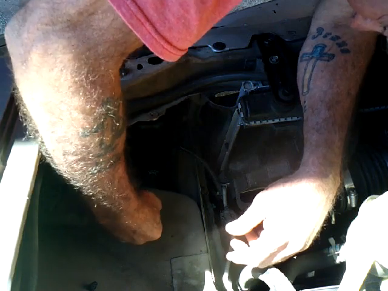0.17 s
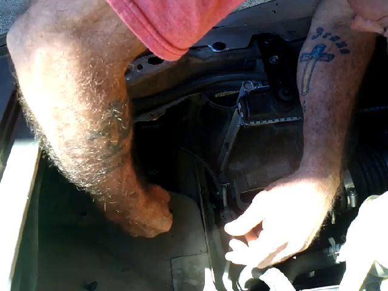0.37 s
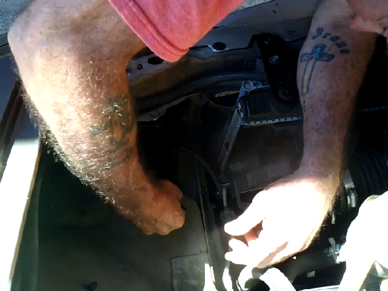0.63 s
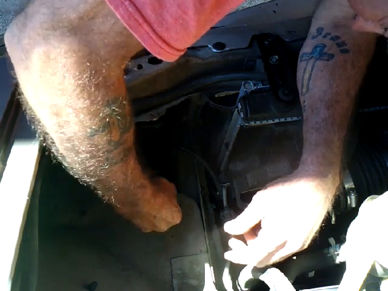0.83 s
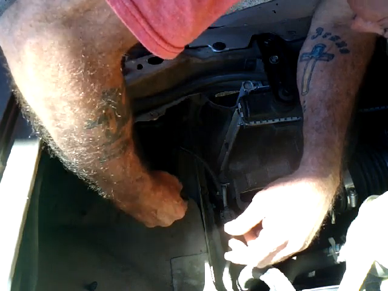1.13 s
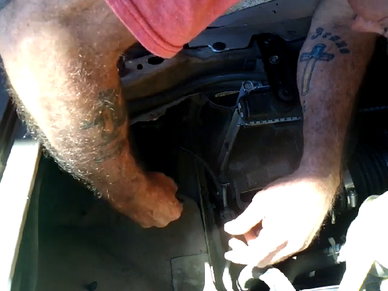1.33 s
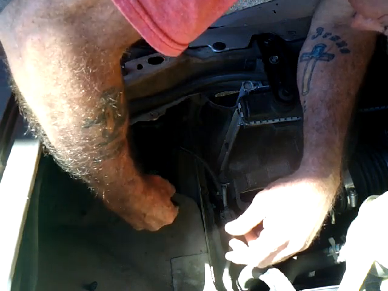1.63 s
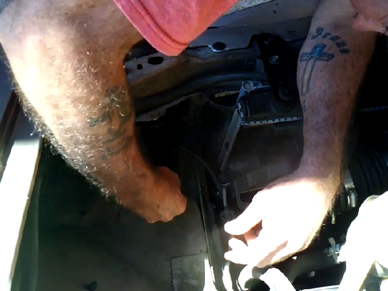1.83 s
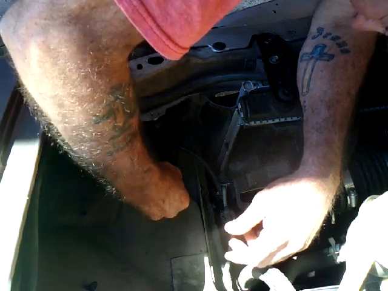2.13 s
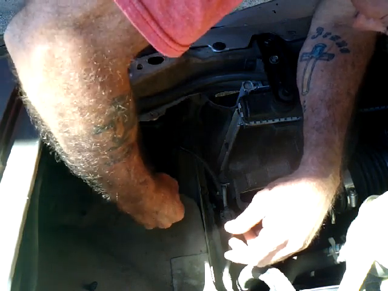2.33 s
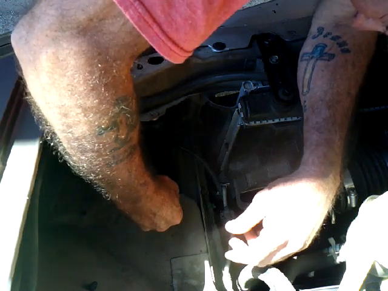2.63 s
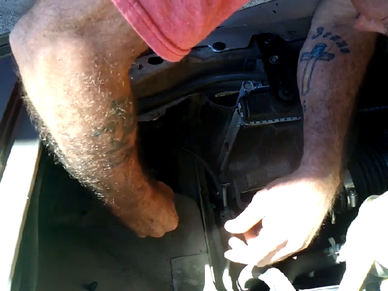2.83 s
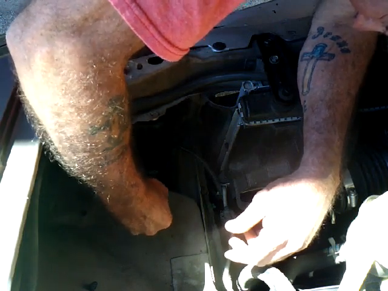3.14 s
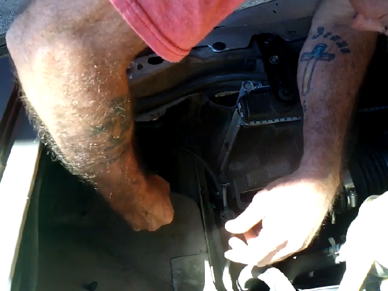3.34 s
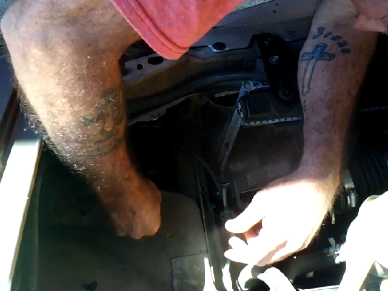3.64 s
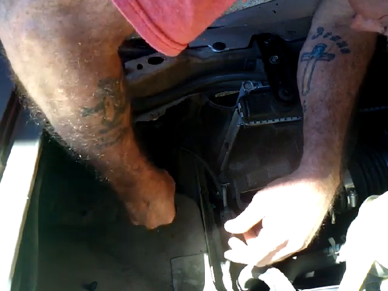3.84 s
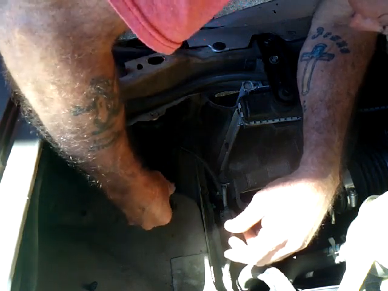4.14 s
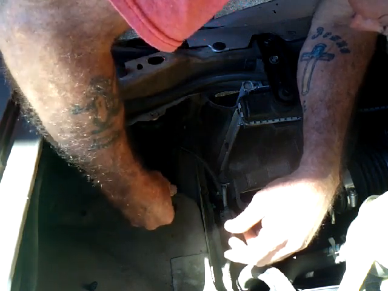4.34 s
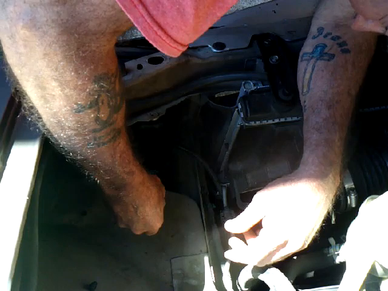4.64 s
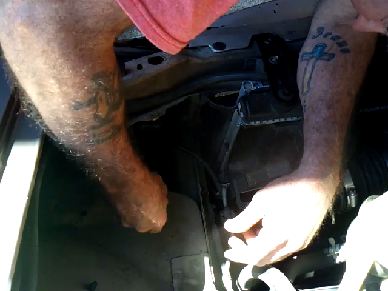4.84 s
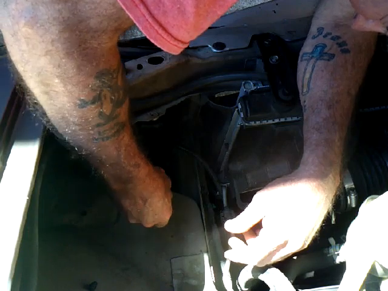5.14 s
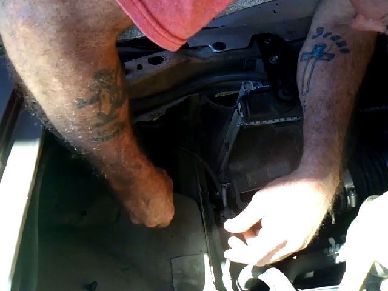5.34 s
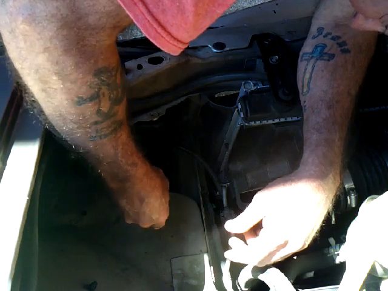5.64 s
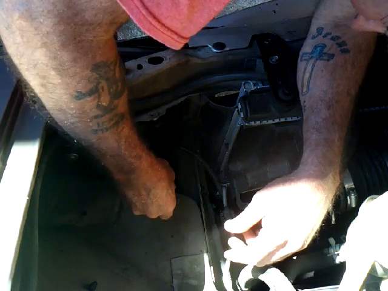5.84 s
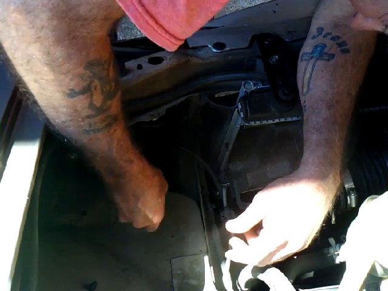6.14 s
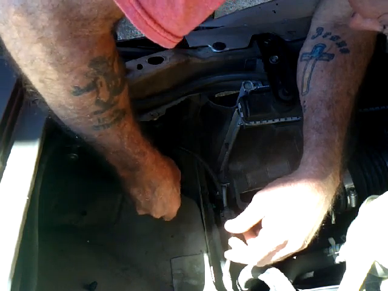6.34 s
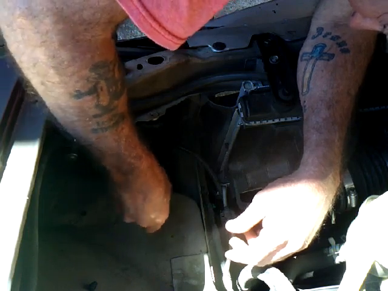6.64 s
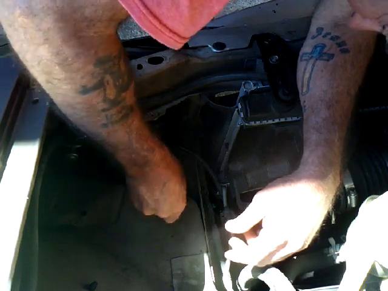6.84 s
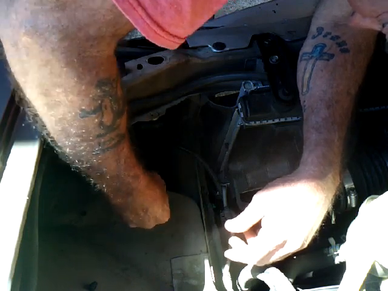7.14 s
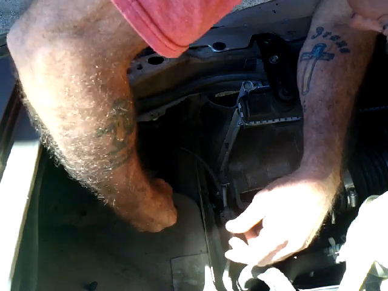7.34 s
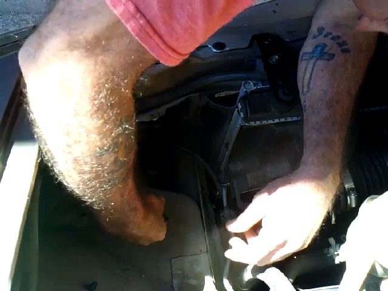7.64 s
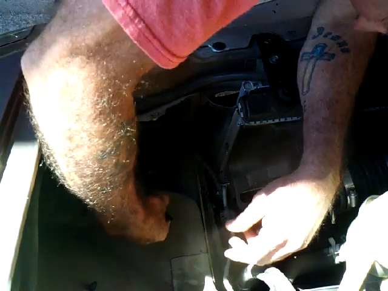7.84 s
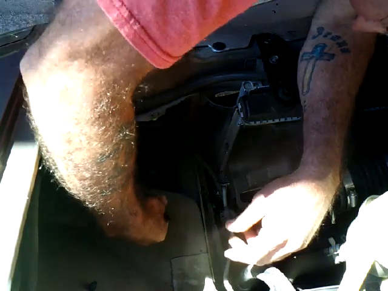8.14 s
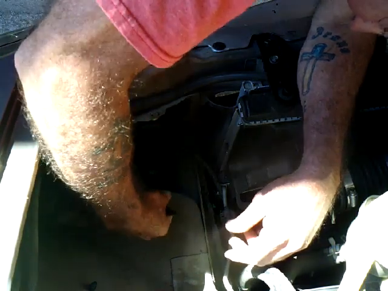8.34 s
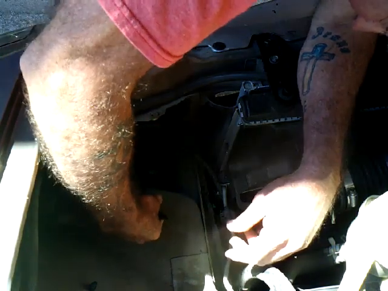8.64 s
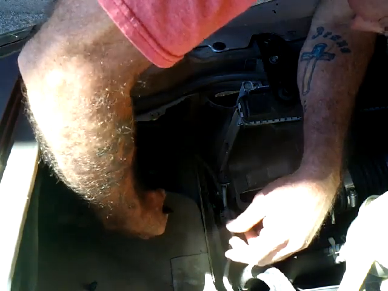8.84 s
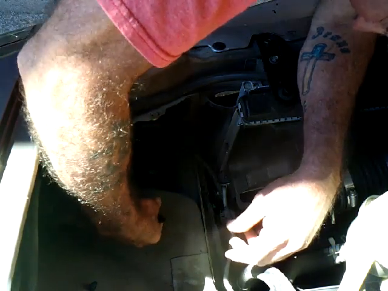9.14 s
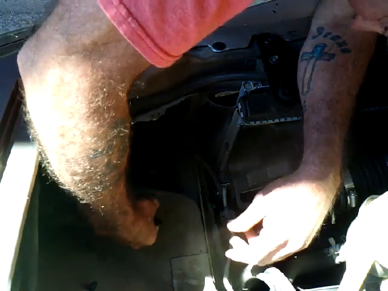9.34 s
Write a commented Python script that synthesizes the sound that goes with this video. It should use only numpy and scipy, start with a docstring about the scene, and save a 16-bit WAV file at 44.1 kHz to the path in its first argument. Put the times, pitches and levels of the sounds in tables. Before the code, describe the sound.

Close, rapid back-and-forth rasping of wire bristles on metal in a car's engine bay, with dull thumps and quiet outdoor air.

```python
"""A stiff wire brush scrubs a connector's prongs in a car's engine bay, about eight strokes a second.
Each stroke bites, drags and lets go: the bristles hiss, snap and squeak, rasp in the housing and shake
the hollow panel that holds it. On the harder strokes the brush head knocks against the connector.
Heard close up on one narrow-band microphone, with short reflections off the bay's metal walls.
Behind it is quiet outdoor air, and a far-off rush that swells towards the end."""
import sys
import numpy as np
from scipy import signal
from scipy.fft import rfft, irfft, next_fast_len
from scipy.io import wavfile
from scipy.ndimage import map_coordinates

SR = 44100
rng = np.random.default_rng(int(sys.argv[2]) if len(sys.argv) > 2 else 0)


def store_wav(level_fs):
    """Save 16-bit WAV to argv[1]."""
    pcm = np.round(np.clip(np.atleast_2d(level_fs), -1, 1) * 32767)
    wavfile.write(sys.argv[1], SR, pcm.T.astype(np.int16))


N = 418068

# modes of the hollow panel, main mode first: f/Hz, width/Hz, level/dB
PANEL_MODES = [(204, 19.2, -5), (238.2, 27.3, 0), (261, 29.6, -0.5), (296.6, 33.7, -9), (371, 29, -18)]
# modes of the connector housing and its bracket: f/Hz, width/Hz, level/dB
HOUSING_MODES = [(429.5, 51, -6), (510.2, 13.2, 7), (560, 52, -3), (661, 93, -3.5), (738, 35, 0),
                 (811, 69, -6), (933, 95, -2.5), (1033, 142, -6.5), (1123, 54, -6.5), (1238, 33, -7.5),
                 (1439, 69, -10.5), (1567, 63, -11.5), (1647, 33.3, -18.5), (1970, 130, -26)]


def scrubbing():
    """Clumps of wires snag on the prongs; the tuft hisses and twangs, prongs, housing and panel ring."""
    # spectrum of the wire tuft: f/Hz, level/dB
    tuft_spectrum = [(900, -34.5), (2400, -26), (3400, -6.5), (4200, -11), (4450, -3.5), (4900, -14.5),
                     (5500, -6.5), (6000, 1), (6450, 2.5), (6800, 0.5), (7000, -4), (7100, -2),
                     (7280, -3.5)]
    # modes of the metal prongs: f/Hz, width/Hz, level/dB
    prong_modes = [(1749, 85, 7.5), (2247, 143, 1), (2647, 217, 2.5), (2875, 90, 6), (3094, 70, 0.5),
                   (3476, 100, 5.5), (3840, 45, -10), (4474, 76, 2.5), (5514, 59, 1.5)]
    firm_db = -34  # reference level of a firm stroke
    rasp_growth, shake_growth = 0.83, 0.88  # dB per dB of hiss: harder strokes are brighter
    t = np.arange(N) / SR
    effort_db = stroke_levels() - firm_db
    on_housing, on_panel, on_prongs, on_tips = grip()
    hiss = amp(firm_db + effort_db)
    rasp = on_housing * amp(firm_db + rasp_growth * effort_db)
    shake = on_panel * amp(firm_db + shake_growth * effort_db)
    snag = unit(amp(3.08 * wobble(190) + 1.73 * wobble(60)))
    slips = snag * catches(rate=2500, spread_db=4.5, rub=0.36)
    tips = on_tips * twang(rate=180, t60=0.026, spread_db=18.5)
    tuft = (coloured(slips, tuft_spectrum) + tips) / np.hypot(1, on_tips)
    prongs = ringing(on_prongs * rasp, slips, prong_modes)
    housing = amp(-1) * ringing(rasp, slips, HOUSING_MODES)
    # the pull on the panel builds, up to a limit, just before the wires let go
    pull = np.minimum(np.interp(t + 0.0053, t, shake), amp(-21))
    # slips drive the panel's upper modes most
    drag = filtered(slips, lambda hz: 1 / np.sqrt(1 + (240 / (hz + 1)) ** 10))
    panel = amp(2) * ringing(pull, drag, PANEL_MODES)
    return amp(4) * hiss * tuft + prongs + housing + panel


def stroke_levels():
    """Every stroke bites, drags with rising or easing pressure and lets go: the envelope in dB."""
    # strokes, to and fro: start/s, length/s, level/dB, swell from start to end/dB
    strokes = [(0.0, 0.073, -47.5, 4.5), (0.119, 0.053, -47, -13), (0.257, 0.04, -48.5, -10),
               (0.345, 0.051, -49.5, 7), (0.525, 0.057, -48.5, -2), (0.646, 0.055, -35.5, 8),
               (0.736, 0.023, -38, -6), (0.776, 0.036, -34.5, 7), (0.88, 0.076, -37, 11),
               (1.011, 0.051, -38.5, 1), (1.077, 0.021, -36, 3), (1.159, 0.065, -38.5, -19.5),
               (1.261, 0.079, -39.5, 8), (1.4, 0.04, -32.5, -2), (1.504, 0.036, -35, 3),
               (1.563, 0.0089, -32.5, 2), (1.639, 0.038, -34.5, 3.5), (1.719, 0.11, -42.5, 0),
               (1.872, 0.033, -40, 5), (1.959, 0.026, -41, -1.5), (2.026, 0.037, -42, -1.5),
               (2.128, 0.055, -43.5, 10.5), (2.232, 0.063, -35.5, 4.5), (2.374, 0.057, -38.5, 7),
               (2.478, 0.088, -41, -10.5), (2.619, 0.11, -38.5, 10), (2.814, 0.015, -31.5, 0.5),
               (2.903, 0.047, -45.5, 4), (2.977, 0.11, -42.5, -9.5), (3.116, 0.139, -38.5, 10),
               (3.352, 0.018, -43, -11), (3.396, 0.05, -38.5, 3), (3.489, 0.046, -42, -8),
               (3.577, 0.09, -41.5, 11.5), (3.696, 0.077, -46, 7), (3.826, 0.062, -42, 12),
               (3.963, 0.089, -46, 14), (4.106, 0.035, -40, 11.5), (4.227, 0.045, -51.5, 11),
               (4.405, 0.029, -46.0, -13.5), (4.468, 0.12, -45.5, 5), (4.65, 0.029, -38.5, -16.5),
               (4.716, 0.027, -44.5, 7.5), (4.801, 0.067, -42, -16), (4.902, 0.012, -36.5, 14),
               (4.98, 0.068, -43.5, 17), (5.157, 0.03, -42, -12), (5.218, 0.073, -42, 12.5),
               (5.356, 0.054, -45.0, 17.5), (5.456, 0.098, -42.5, 13), (5.654, 0.013, -35, -2),
               (5.728, 0.056, -40.5, 11.5), (5.869, 0.024, -39.5, 10), (5.999, 0.031, -46.5, 8.5),
               (6.093, 0.049, -42.5, 3), (6.208, 0.067, -45.5, 13), (6.358, 0.062, -41.5, -14),
               (6.457, 0.058, -40, 9.5), (6.597, 0.029, -36, -4), (6.702, 0.085, -47, 8),
               (6.838, 0.061, -38, -6), (6.913, 0.046, -37, 0), (7.089, 0.034, -45, -7.5),
               (7.187, 0.0092, -43.5, -10), (7.217, 0.014, -38.5, -4), (7.292, 0.041, -42, 4),
               (7.381, 0.102, -36.5, 2.5), (7.503, 0.13, -38.5, 0.5), (7.723, 0.021, -34.5, 2),
               (7.799, 0.025, -40.5, 7), (7.863, 0.0076, -42.5, -0.5), (7.956, 0.0091, -34.5, -14.5),
               (8.029, 0.027, -42.5, 6.5), (8.104, 0.016, -40.5, -5), (8.183, 0.011, -45, -13),
               (8.233, 0.015, -35, -6), (8.314, 0.02, -40, 8.5), (8.379, 0.02, -40, 0),
               (8.439, 0.015, -34, -10.5), (8.544, 0.049, -43.5, 5), (8.633, 0.052, -36.5, 10),
               (8.787, 0.029, -42, 19), (8.86, 0.063, -38, 10.5), (9.046, 0.013, -39, -6),
               (9.102, 0.043, -35.5, 10.5), (9.241, 0.059, -46.0, 7), (9.345, 0.039, -34, -1)]
    attack_s, release_s = 0.012, 0.011  # the wires bite, and spring free at the turn
    t = np.arange(N) / SR
    power = amp(-61 + 1.9 * wobble(30)) ** 2  # stray wires still scratch between strokes
    for start, length, db, swell_db in strokes:
        near = slice(max(0, int(start * SR) - SR // 10), int((start + length) * SR) + SR // 10)
        age = t[near] - start
        contact = np.exp(-(np.minimum(age, 0) / attack_s) ** 2 - np.maximum(age - length, 0) / release_s)
        pressure = amp(db + swell_db * (np.clip(age / length, 0, 1) - .5))
        power[near] += (contact * pressure) ** 2
    return 10 * np.log10(power)


def grip():
    """As the wrist turns, the brush's seat shifts the gains of housing, panel, prongs and wire tips."""
    # the brush's seat: t/s, housing rasp/dB, panel shake/dB, prong ring re rasp/dB, wire-tip ring/dB
    seat = [(0, -0.5, 2.5, -10.5, -7.5), (.75, -4.5, 0, -6.5, -8.5), (1.7, -0.5, 5, -8, -10.5),
            (2.05, 0, 0, -7.5, -8), (2.6, 1, 6, -8.5, -10), (3.4, -1, 4.5, -6.5, -6.5),
            (4.3, 2, 3.5, -8.5, -7.5), (4.9, 4.5, 10, -8, -2.5), (5.65, 2.5, 5.5, -7, -11.5),
            (6.15, 1.5, -1, -6.5, -9.5), (6.7, 1, 5, -9, -12.5), (7.52, 1, 5, -6, -11.5),
            (7.72, 3.5, 6, -8.5, 0.5), (8.5, 3, 5, -10.5, -1), (9.48, 3, 6.5, -8.5, -4)]
    times, *columns = np.transpose(seat)
    return [amp(np.interp(np.arange(N) / SR, times, db)) for db in columns]


def catches(rate, spread_db, rub):
    """Tiny impulses of uneven size as single wires spring free, over smooth rubbing."""
    chance, size, polarity = rng.random(N), rng.standard_normal(N), rng.standard_normal(N)
    ticks = (chance < rate / SR) * np.sign(polarity) * amp(spread_db * np.clip(size, -2, 2))
    return unit(unit(ticks) + rub * rng.standard_normal(N))


def twang(rate, t60, spread_db):
    """Each freed wire rings briefly at a pitch of its own."""
    # bending modes of the free wires: f/Hz, relative scatter between wires, level/dB
    wire_modes = [(1800, 0.11, -10), (2779, 0.09, -23), (6622, 0.0522, -2)]
    t, total = np.arange(SR // 25) / SR, np.zeros(N)
    for hz, scatter, db in wire_modes:
        when, pitch, size = rng.random((int(rate * N / SR), 3)).T
        own_hz = hz * (1 + scatter * np.sqrt(3) * (2 * pitch - 1))
        tones = np.sin(2 * np.pi * own_hz[:, None] * t)
        rings = amp(spread_db * size)[:, None] * tones * amp(-60 * t / t60)
        at = (when * N).astype(int)[:, None] + np.arange(len(t))
        total += amp(db) * unit(np.bincount(at.ravel(), rings.ravel(), N)[:N])
    return total


def snaps():
    """A single stiff wire snaps off a prong's edge with a bright, dry tick."""
    # wires letting go: t/s, level/dB
    releases = [(0.693,-20.5), (1.565,-28.5), (3.236,-25), (3.443,-24), (3.484,-23.5), (4.815,-25),
                (5.045,-26), (5.146,-37), (5.528,-24), (6.207,-31), (6.843,-28.5), (7.175,-26), (7.209,-29),
                (7.606,-33), (7.862,-32.5), (7.943,-24), (8.051,-30.5), (8.104,-31), (8.171,-28.5),
                (8.226,-26.5), (8.433,-28), (8.907,-21), (9.1,-27.5), (9.137,-28.5)]
    # spectrum of the sharp contact: f/Hz, level/dB
    snap_spectrum = [(200, -14), (700, 1), (1800, -1.5), (3000, -16.5), (4800, -15), (6400, 7.5),
                     (7300, -14)]
    ticks = bursts(*np.transpose(releases), t60=.016)
    return filtered(ticks, lambda hz: amp(7 + along(snap_spectrum, hz)))


def squeaks():
    """A wire sticks and slips quickly: a short, rough tone that wavers and sinks as it skates on."""
    # skating wires: centre t/s, half length/s, f/Hz, level/dB
    skates = [(1.652, .012, 1830, -42), (5.16, .016, 2720, -44.5), (5.654, .011, 2680, -41),
              (6.85, .01, 1640, -41), (7.434, 0.016, 2620, -43), (7.49, 0.037, 2900, -56),
              (7.52, 0.074, 1450, -48), (7.531, 0.06, 2280, -45.5), (7.808, 0.013, 1920, -41.5),
              (8.058, 0.014, 1784, -43), (8.112, 0.0068, 2760, -42.5), (8.319, 0.013, 1640, -39.5),
              (8.381, 0.0066, 2760, -40.5), (8.583, 0.021, 1770, -41.5), (9.04, 0.022, 1795, -43.5)]
    sag_oct_per_s = 0.8
    t, out = np.arange(N) / SR, np.zeros(N)
    waver = 1 + .055 * wobble(600) + 0.0302 * wobble(35)
    for centre, half_length, hz, db in skates:
        near = slice(int(centre * SR) - SR // 8, int(centre * SR) + SR // 8)
        offset = t[near] - centre
        pitch = hz * waver[near] * 2 ** (-sag_oct_per_s * offset)
        envelope = amp(db + 4) * np.exp(-(offset / half_length) ** 2)
        out[near] += envelope * np.sin(2 * np.pi * np.cumsum(pitch) / SR)
    return out


def knocks():
    """The head clacks on the connector, pushes the panel, and comes back for a gentler second push."""
    # bumps of the brush head: t/s, panel thump/dB, housing clack/dB
    bumps = [(0.336,-25.5,-47), (0.936,-14.5,-29), (1.006,-20,-31), (1.722,-19,-42), (2.709,-22,-25),
             (2.963,-23.5,-37), (4.134,-23,-32), (4.493,-24,-21), (4.585,-9,-20), (4.819,-2,-12),
             (5.047,-2.5,-11.5), (5.217,-25,-27), (5.293,-6.5,-13), (5.543,-4.5,-11.5), (5.649,-16.5,-26),
             (5.704,-27.5,-29), (5.783,-4.5,-13), (6.035,-11.5,-26), (6.273,-3.5,-13), (6.510,-7.5,-15),
             (6.577,-16,-22.5), (6.768,-16,-21.5), (7.084,-23,-36.5), (7.947,-14.5,-28), (8.443,-16.5,-43),
             (8.678,-16,-32), (8.919,-15,-22), (9.137,-11.5,-21), (9.362,-16,-35)]
    # spectrum of the blunt contact: f/Hz, level/dB
    clack_spectrum = [(150, -22.5), (400, -4.5), (700, -6.5), (1150, -9), (1600, -24.5), (2500, -28),
                      (5000, -35)]
    times, thump_db, clack_db = np.transpose(bumps)
    pushes = np.bincount(np.round(times * SR).astype(int), amp(thump_db), N)
    blow = panel_boom(stiffening=.42, settle_s=.016, rise_s=.0075, t60=.08)
    rebound = panel_boom(stiffening=.1, settle_s=.016, rise_s=.012, t60=.085)
    double_boom = amp(0.65) * blow + amp(-16) * np.roll(rebound, round(.034 * SR))
    thump = signal.fftconvolve(pushes, double_boom)[:N]
    clack = filtered(bursts(times, clack_db, t60=0.021), lambda hz: amp(19.5 + along(clack_spectrum, hz)))
    jolt = amp(19) * bursts(times, clack_db, t60=0.053)
    jolt = filtered(jolt, lambda hz: 1 / (1 + (hz / 1550) ** 4))  # the blunt head excites little treble
    clatter = resonate(jolt, HOUSING_MODES) + amp(17.5) * resonate(jolt, PANEL_MODES[-1:])
    return thump + clack + clatter


def panel_boom(stiffening, settle_s, rise_s, t60):
    """A hard push stiffens the panel: its main mode starts sharp and sags to rest pitch as it dies."""
    t = np.arange(SR // 4) / SR
    hz = PANEL_MODES[0][0] * (1 + stiffening * np.exp(-t / settle_s))
    swing = (1 - np.exp(-(t / rise_s) ** 3)) * amp(-60 * t / t60)
    return swing / swing.max() * np.sin(2 * np.pi * np.cumsum(hz) / SR)


def engine_bay(x):
    """Close metal walls send short, dense reflections back to the microphone."""
    # reverberation of the bay: f/Hz, t60/s
    decay_times = [(200, 0.41), (1500, 0.23), (7000, 0.18)]
    hz, t, noise = signal.stft(rng.standard_normal(SR // 4), SR, nperseg=256)
    decay = amp(-60 * t / along(decay_times, hz)[:, None])
    tail = signal.istft(noise * decay, SR, nperseg=256)[1]
    delayed = np.pad(x, (SR // 400, 0))  # 2.5 ms behind the direct sound
    return signal.fftconvolve(delayed, tail / np.linalg.norm(tail))[:N]


def background():
    """Steady outdoor air around the car with a light rub of resting wires on top, and a soft rush far off that
    swells towards the end."""
    # spectrum of the steady floor, outdoor air below and the light rub of resting wires at the top: f/Hz,
    # level/dB
    air_spectrum = [(20, -7.5), (60, -5), (110, 0.5), (170, 0), (250, 5), (400, -11), (900, -13),
                    (2000, -22), (4500, -35.5), (6500, -32), (7500, -24)]
    # rise of the distant rush: t/s, level/dB
    rush_levels = [(0, -85), (4, -57), (6.999, -55), (8.3, -46), (8.8, -45), (9.15, -38.5), (9.48, -37)]
    # spectrum of the rush: f/Hz, level/dB
    rush_spectrum = [(40, -18.5), (110, -0.5), (300, -4.5), (600, 0), (950, -3.5), (1400, -10.5),
                     (2000, -18), (4000, -36.5)]
    swell = amp(np.interp(np.arange(N) / SR, *np.transpose(rush_levels)) + 2.1 * wobble(7))
    air = amp(-43.5) * coloured(rng.standard_normal(N), air_spectrum)
    return air + swell * coloured(rng.standard_normal(N), rush_spectrum)


def bursts(times, dbs, t60):
    """Brief rough contacts, each dying by 60 dB in t60 seconds."""
    t, out = np.arange(SR // 10) / SR, np.zeros(N + SR)
    for start, db in zip(times, dbs):
        out[round(start * SR):][:len(t)] += amp(db - 60 * t / t60) * rng.standard_normal(len(t))
    return out[:N]


def ringing(drive, slips, modes):
    """Slips heard through a resonant body, at an rms level that follows drive."""
    return resonate(drive * slips, modes) / np.std(resonate(slips, modes))


def resonate(x, modes):
    """x through a body's resonances (f/Hz, width/Hz, level/dB), alternating in sign."""
    return filtered(x, lambda f: sum(
        (-1) ** k * amp(db) * 1j * f * width / (centre ** 2 - f ** 2 + 1j * f * width)
        for k, (centre, width, db) in enumerate(modes)))


def coloured(x, spectrum):
    """x shaped by a spectrum (f/Hz, level/dB), at rms 1."""
    return unit(filtered(x, lambda hz: amp(along(spectrum, hz))))


def filtered(x, response):
    """x through a complex frequency response."""
    size = next_fast_len(N + SR // 2)
    return irfft(rfft(x, size) * response(np.fft.rfftfreq(size, 1 / SR)), size)[:N]


def wobble(rate):
    """A smooth random curve of rms 1, rate knots a second."""
    knots = rng.standard_normal(int(N * rate / SR) + 4)
    return unit(map_coordinates(knots, [np.arange(N) * rate / SR]))


def along(points, hz):
    """Points (f/Hz, value) read on a log frequency axis."""
    freqs, values = np.transpose(points)
    return np.interp(np.log(hz + 1), np.log(freqs + 1), values)


def amp(db):
    """Decibels to gain."""
    return 10 ** (np.asarray(db) / 20)


def unit(x):
    """Scale to rms 1."""
    return x / np.sqrt(np.mean(x ** 2) + 1e-20)


def scene():
    """Brush and knocks up close, the bay's walls around them, the open air behind; mono."""
    brush = scrubbing() + snaps() + squeaks()
    bumps = knocks()
    walls = engine_bay(amp(-14.5) * brush + amp(-13) * bumps)
    return (brush + bumps + walls + background())[None]


def record(dry):
    """A narrow-band microphone rounds the hardest peaks; its low sample rate mirrors the top treble."""
    ceiling, band_hz, mic_rate_hz, top_hz = .88, 7340, 16000, 9200
    rounded = dry[0] / (1 + np.abs(dry[0] / ceiling) ** 6) ** (1 / 6)
    heard = filtered(rounded, lambda hz: 1 / (1 + (hz / band_hz) ** 300))
    mirror = heard * np.cos(2 * np.pi * mic_rate_hz * np.arange(N) / SR)
    faint_image = filtered(mirror, lambda hz: amp(along([(8700, -15.0), (9200, -44.5)], hz)))
    return filtered(heard + faint_image, lambda hz: hz < top_hz)[None]


dry = scene()
out = record(dry)
store_wav(out)
```